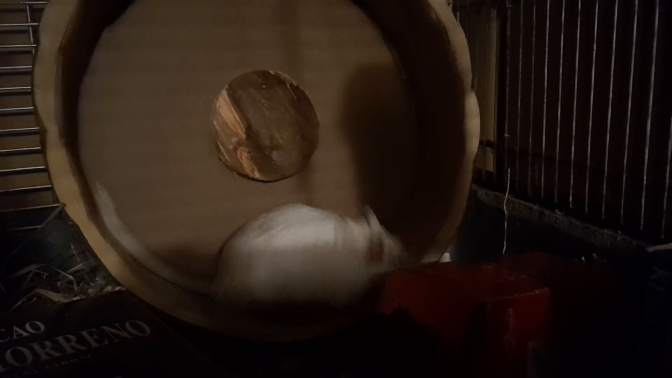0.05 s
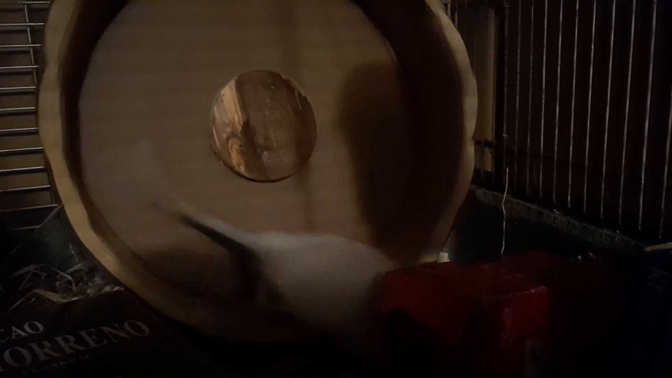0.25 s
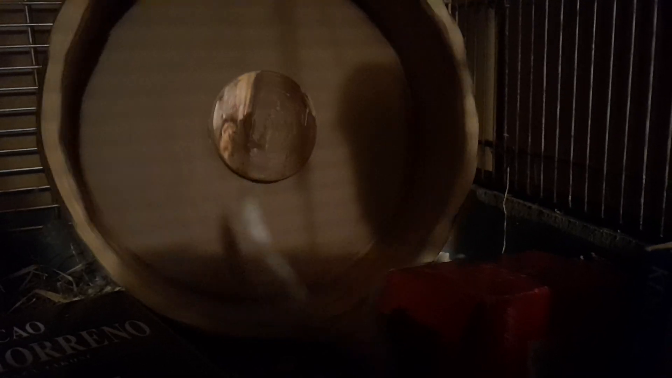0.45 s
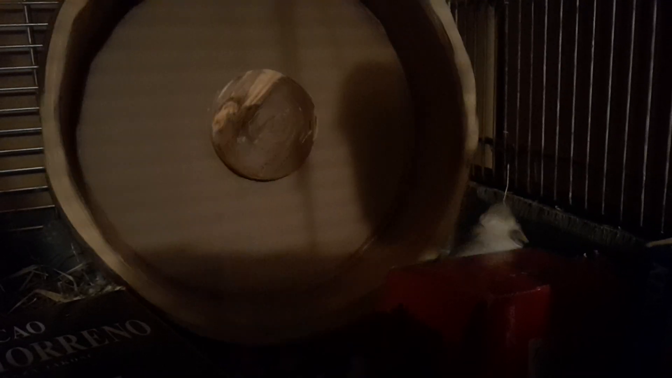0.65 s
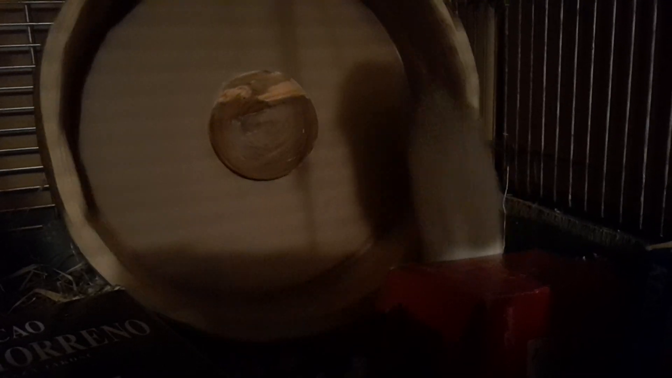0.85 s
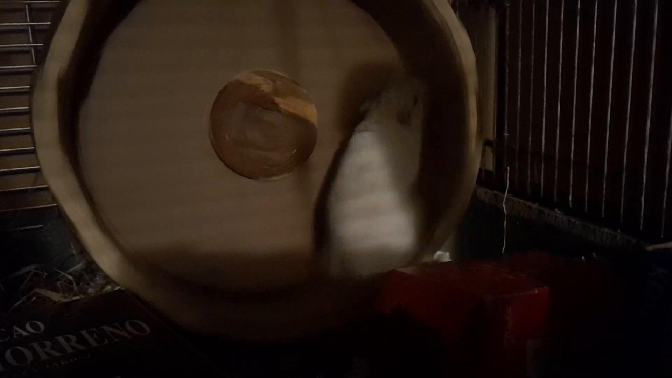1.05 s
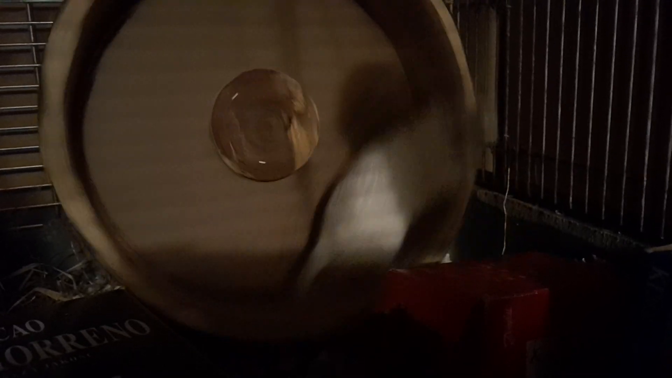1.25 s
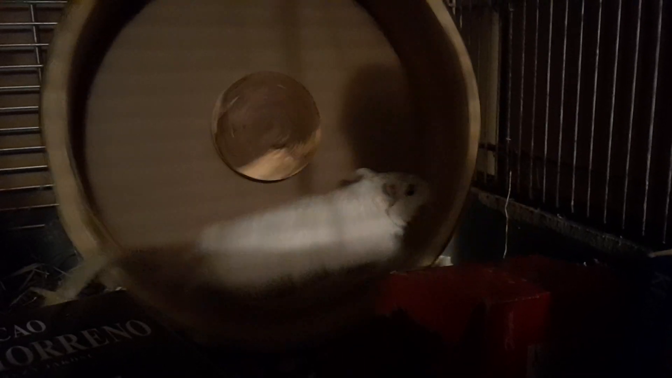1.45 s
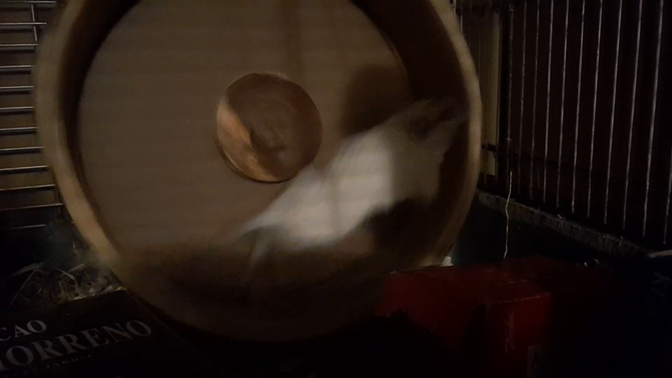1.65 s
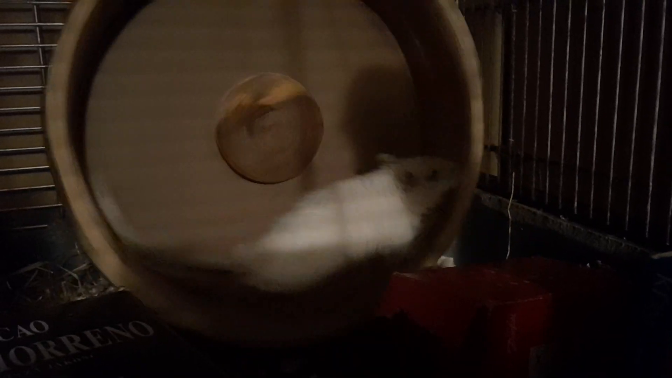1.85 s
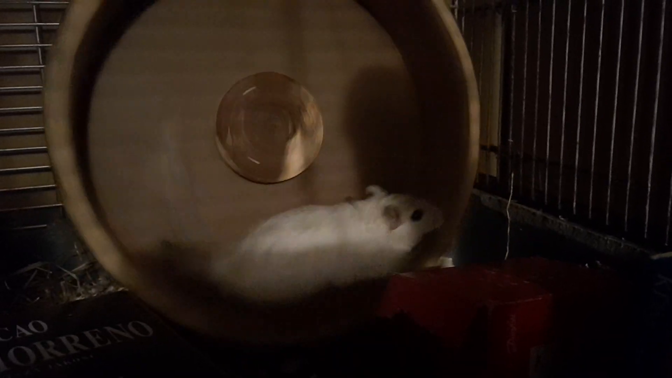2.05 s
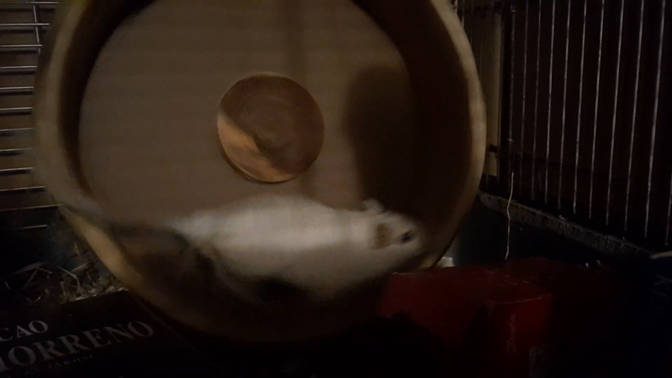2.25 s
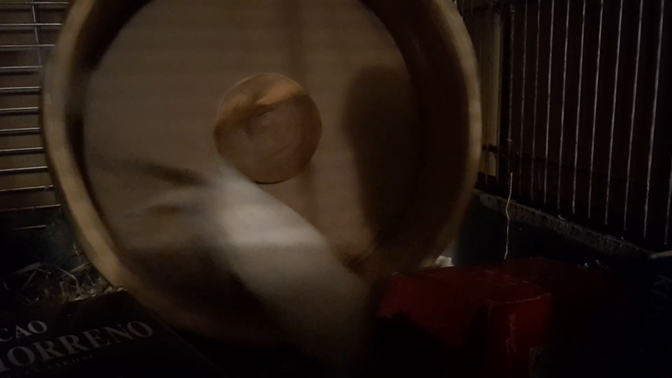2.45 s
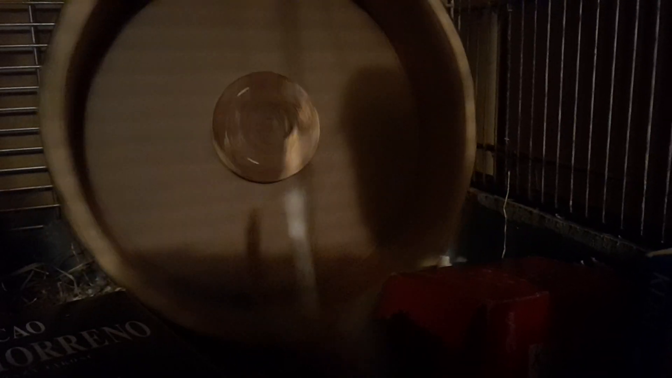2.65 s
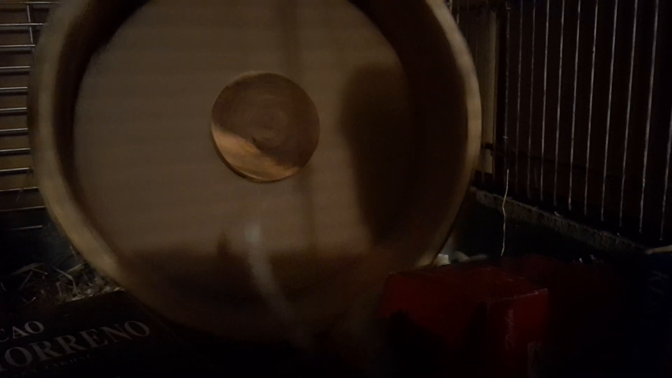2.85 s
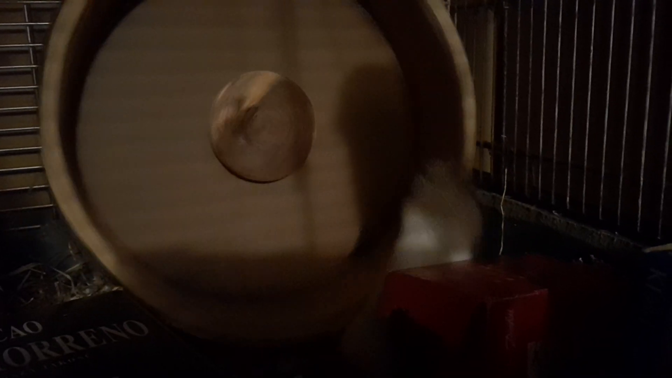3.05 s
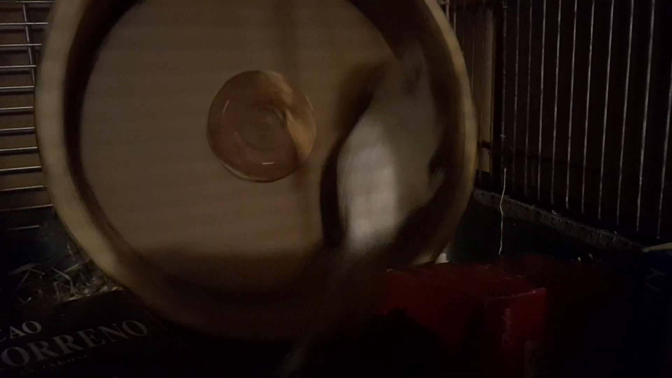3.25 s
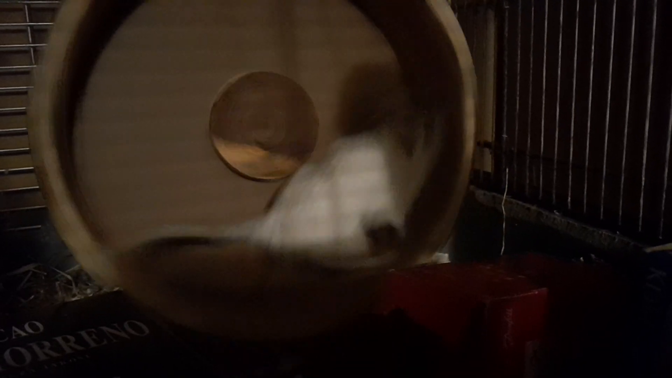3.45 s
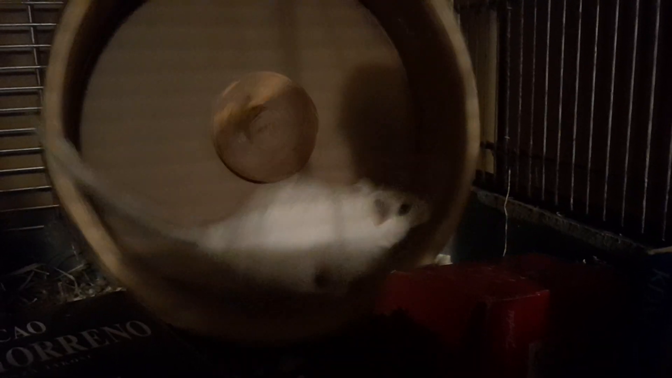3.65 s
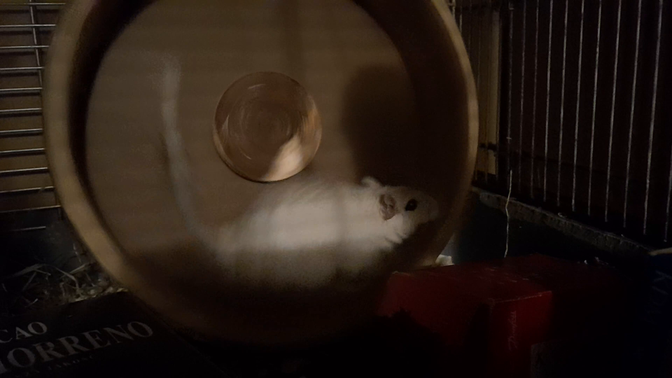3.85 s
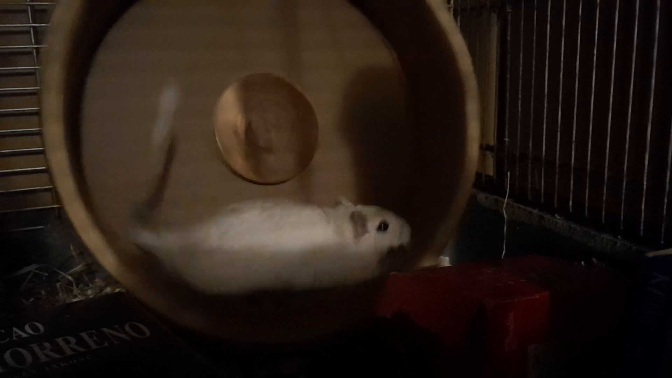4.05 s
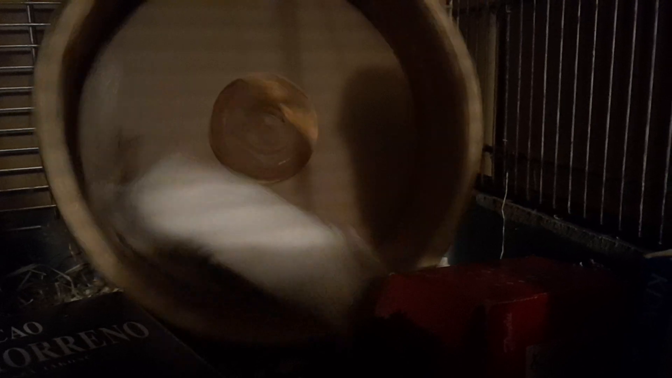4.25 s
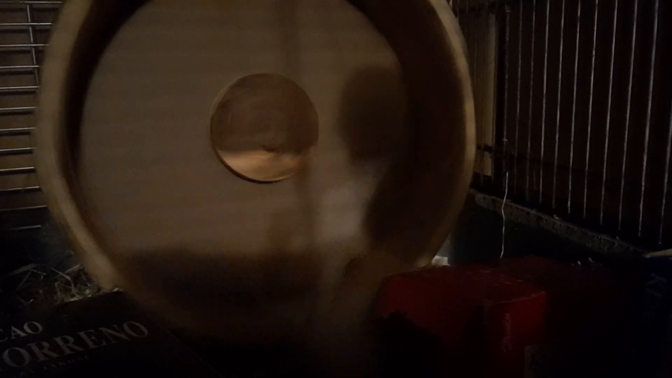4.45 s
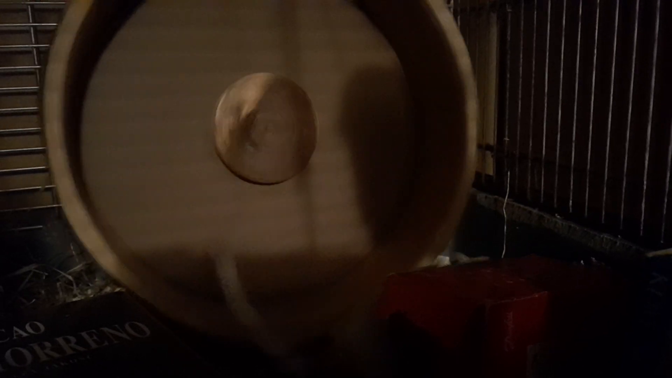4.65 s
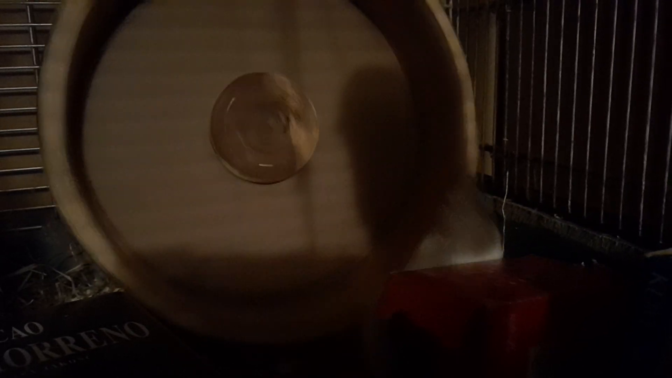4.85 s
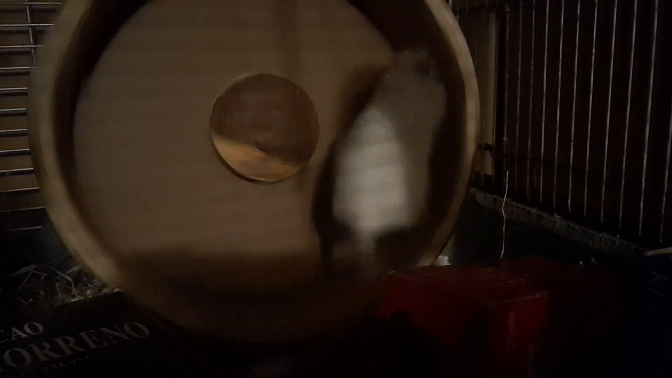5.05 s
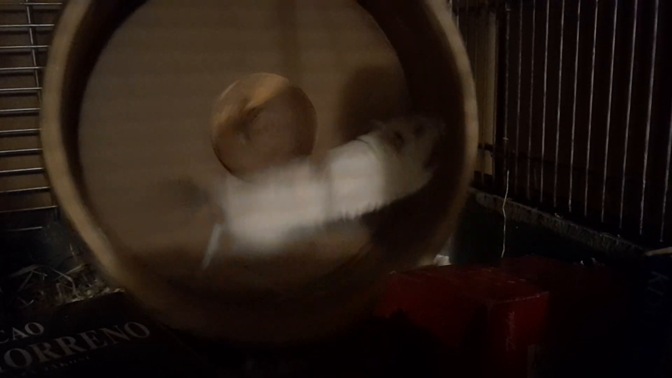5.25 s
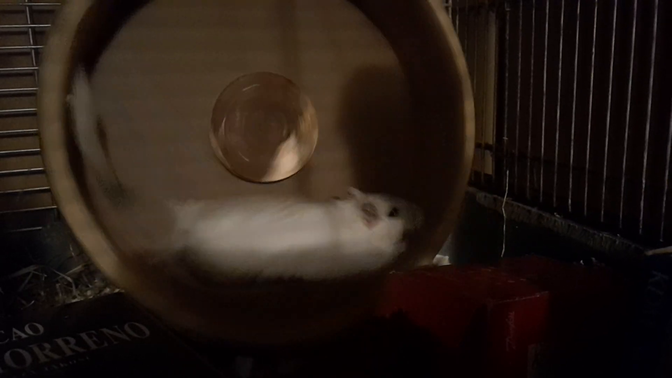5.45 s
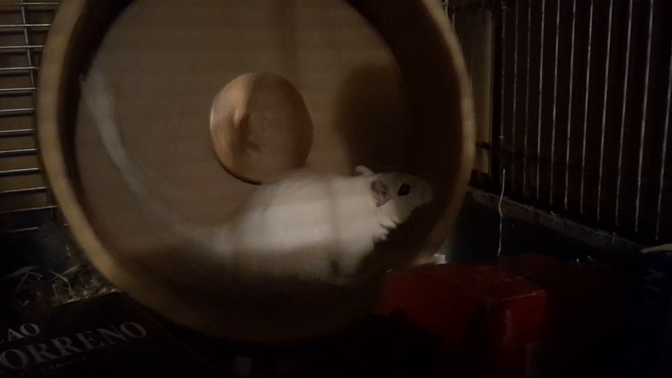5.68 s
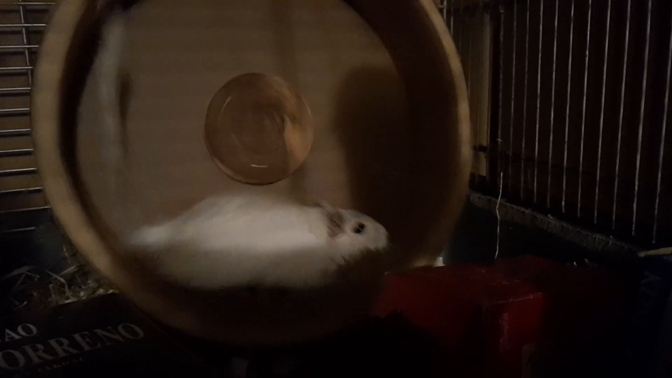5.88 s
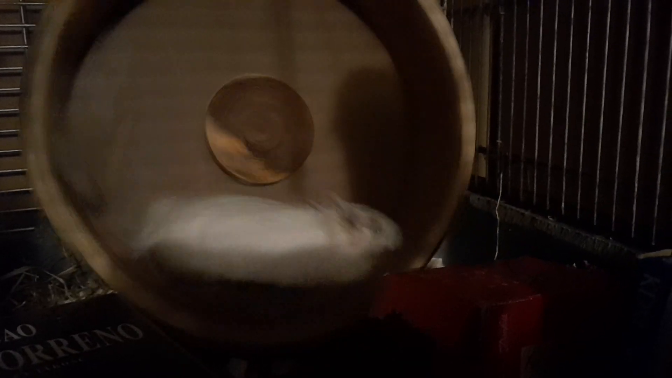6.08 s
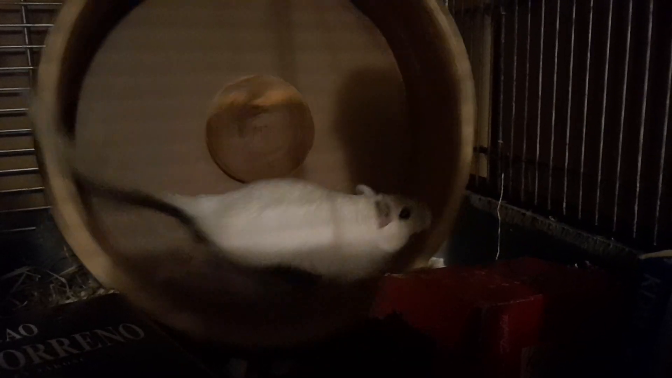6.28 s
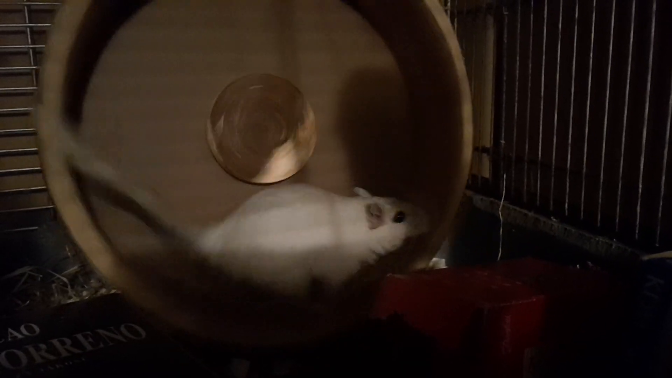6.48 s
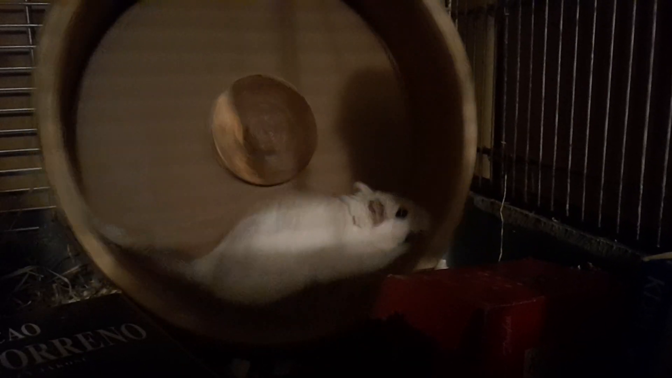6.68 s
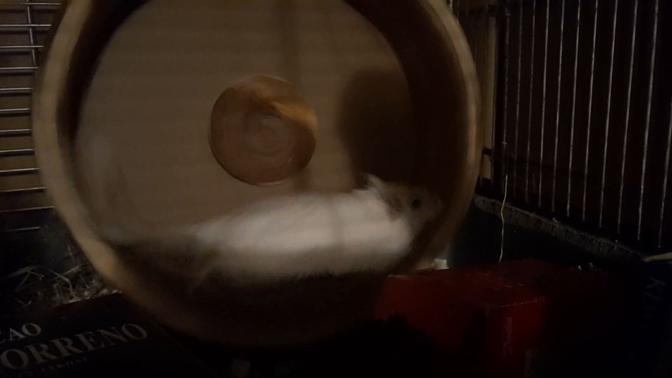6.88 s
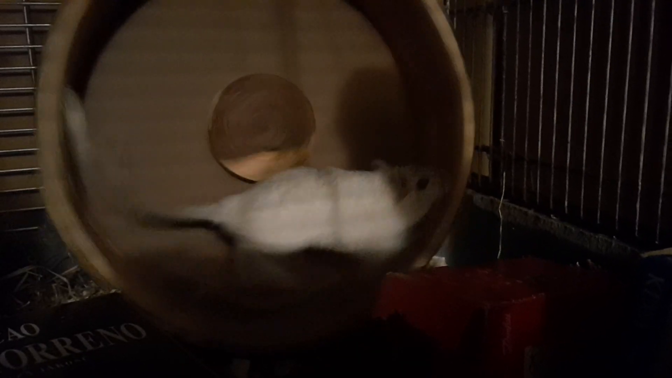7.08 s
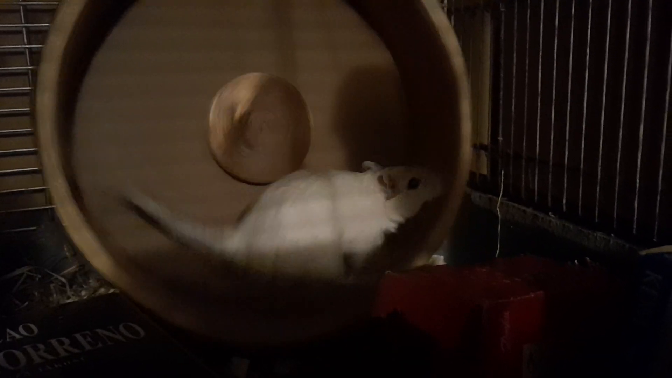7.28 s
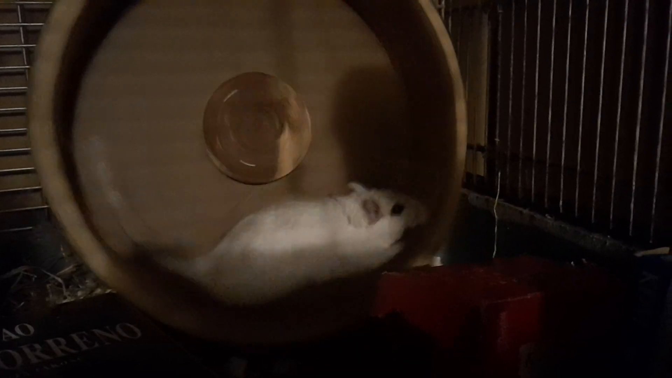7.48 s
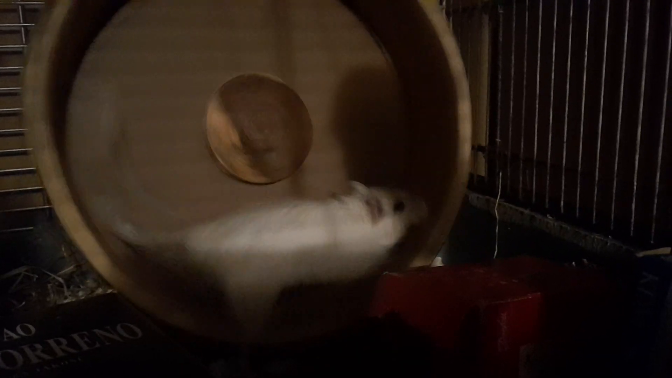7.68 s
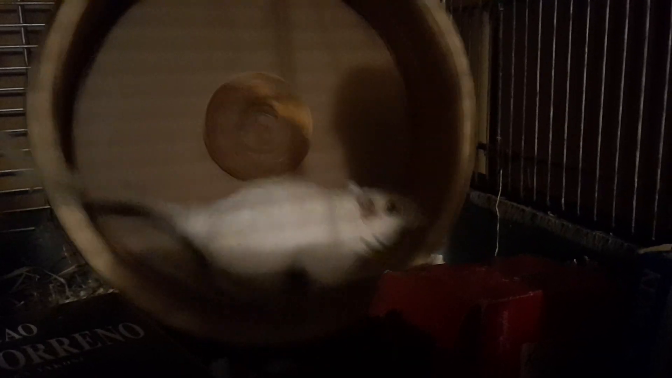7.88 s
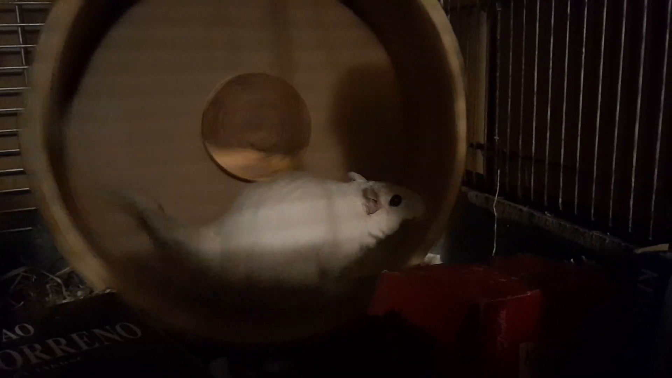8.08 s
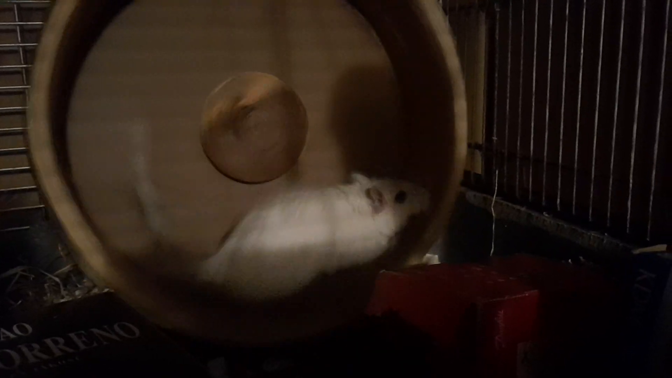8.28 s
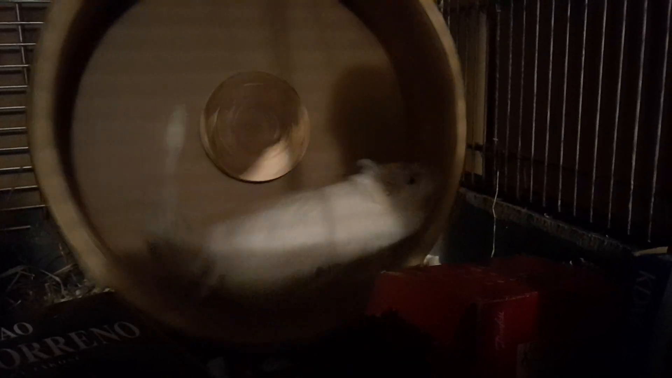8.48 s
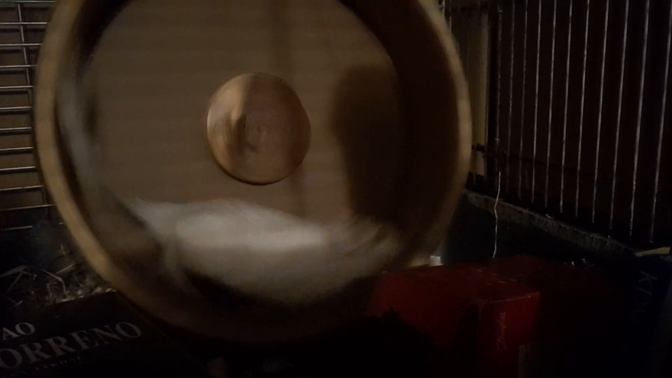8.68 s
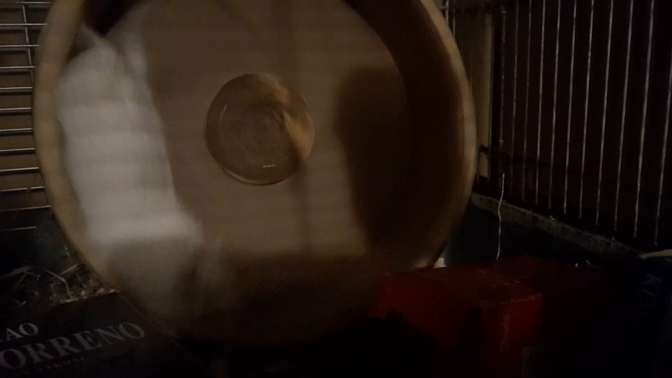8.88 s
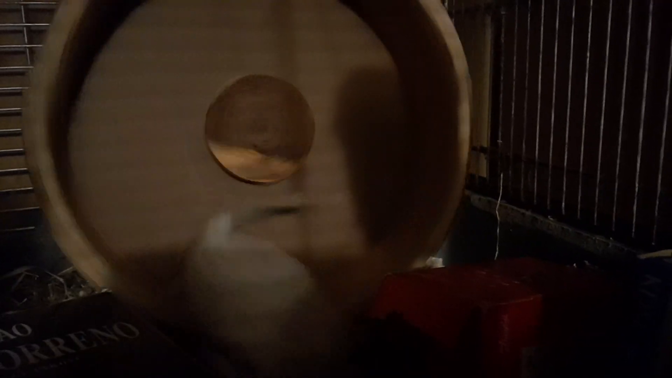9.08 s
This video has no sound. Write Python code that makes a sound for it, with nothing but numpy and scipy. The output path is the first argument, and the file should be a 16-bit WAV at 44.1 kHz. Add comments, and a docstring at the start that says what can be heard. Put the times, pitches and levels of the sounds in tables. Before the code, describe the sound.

Dull wooden knocks and pattering paws from a rodent's exercise wheel come in bursts, with crackling bedding and soft bumps in the pauses.

```python
"""A wooden wheel knocks on its loose axle as a gerbil runs in spurts, hopping into wood shavings in between.
Each knock is a set of swelling, fading tones, with a rattle of the stand and a long ringing of the wheel after
it. Paws slap the rim (ringing tones and noise), claws tick (short noise), the axle rumbles, scrapes and
squeaks. The body bumps on the cage floor and the shavings crackle (shaped noise and tiny pings). A faint steady
hum and hiss fill the small room; two microphones stand close by."""
import sys
import numpy as np
from scipy import signal
from scipy.fft import rfft, irfft, next_fast_len
from scipy.io import wavfile

SR = 44100
rng = np.random.default_rng(int(sys.argv[2]) if len(sys.argv) > 2 else 0)


def wav_out(sig):
    """Save sig, one row per channel (or a flat mono array), as 16-bit PCM at SR to the path in sys.argv[1]."""
    wavfile.write(sys.argv[1], SR, np.round(np.clip(np.atleast_2d(sig).T, -1, 1) * 32767).astype(np.int16))


N = 402633
T = np.arange(N) / SR  # time of every sample [s]

# bounds that knock the wheel on its axle and drive it round: (time [s], level [dB])
BOUNDS = [(0.419, -27.5), (0.668, -29), (0.949, -20), (1.448, -20.5), (1.518, -14.5), (1.63, -20),
          (1.733, -15.5), (2.134, -1.5), (2.421, -9.5), (2.572, -14.5), (2.652, -15), (3.023, -24.5),
          (3.173, -17.5), (3.415, -28), (3.605, -5.5), (3.6685, -16), (3.7771, 3), (3.877, 0), (3.96, -9),
          (3.9818, 0), (4.265, -6.5), (4.424, -16.5), (5.262, -22), (5.398, -10.5), (5.482, -1.5),
          (5.5599, -2), (5.635, -4.5), (5.725, -8), (5.835, -6.5), (6.0513, -3), (6.194, -6.5), (6.316, -6),
          (6.456, -10), (6.531, -4), (6.808, -17), (7.013, -20), (7.095, 4), (7.186, -7), (7.256, -8.5),
          (7.326, -6.5), (7.4416, -10), (7.557, -10.5), (7.58, -1.5), (7.791, -6.5), (7.936, -11),
          (8.0163, -18), (8.05, -2), (8.119, -4), (8.224, -8), (8.389, -10.5), (8.45, -13.5), (8.55, 1.5),
          (8.618, -17), (8.819, 1.5), (8.892, 1), (9.0796, 2)]
# spurts of running in the wheel: (start [s], end [s], level [dB])
RUNNING_SPURTS = [(1.46, 2.417, -3.5), (3.333, 4.203, -1), (5.299, 6.68, -1), (6.872, 8.85, 0.5)]
# colour of the low rumble: (frequency [Hz], level [dB])
RUMBLE_TONE = [(18, -49), (30, -8.5), (69, 0.5), (162, -3), (196, -11), (237, -1), (397, -11), (446, -10.5),
               (517, -7.5), (693, -19.5), (839, -20.5), (1000, -49), (1300, -62), (2200, -120)]


def undb(db):
    """Turn decibels into a gain."""
    return 10 ** (np.asarray(db) / 20)


def colour(x, points):
    """Filter by (frequency [Hz], level [dB]) points, falling steeply outside them."""
    hz, db = np.transpose(points)
    size = next_fast_len(x.shape[-1])
    f = np.maximum(np.fft.rfftfreq(size, 1 / SR), 1)
    skirts = np.minimum(f / hz[0], 1) ** 2 * np.minimum(hz[-1] / f, 1) ** 2
    gain = undb(np.interp(np.log(f), np.log(hz), db)) * skirts
    return irfft(rfft(x, size) * gain, size)[..., :x.shape[-1]]


def unit(x):
    """Scale to an rms level of 1."""
    return x / np.sqrt(np.mean(x ** 2))


def noise(size, alike=0):
    """Two channels of white noise; alike is the share of power they have in common."""
    alike = np.clip(alike, 0, 1)
    own = rng.standard_normal((2, size))
    common = rng.standard_normal(size)
    return np.sqrt(1 - alike) * own + np.sqrt(alike) * common


def fade(t, t60):
    """Die away exponentially, falling by 60 dB in t60 seconds."""
    return np.exp(-np.log(1000) * t / t60)


def add(out, s, sound):
    """Mix a sound in at time s [s]."""
    i = max(int(s * SR), 0)
    out[:, i:i + sound.shape[-1]] += sound[:, :max(N - i, 0)]


def walk(rate):
    """A random wander with a spread near 1, taking a new direction rate times a second."""
    times = np.arange(0, T[-1] + 1, 1 / rate)
    return 1.36 * np.interp(T, times, rng.standard_normal(len(times)))


def grains(rate, spread_db, t60):
    """Random tiny contacts, rate per second and of unequal size, each a short noise burst; rms 1."""
    count = 40000
    when = rng.random(count)
    size = undb(spread_db * np.minimum(rng.exponential(size=count), np.log(15)))
    keep = int(min(rate * N / SR, count))
    power = np.bincount((when[:keep] * N).astype(int), size[:keep] ** 2, N)
    # power dies twice as fast as amplitude
    power = signal.lfilter([1], [1, -fade(2 / SR, t60)], power)
    return unit(np.sqrt(power) * noise(N))


def flakes(count, cycles, spread_db):
    """Single shavings flick, each ringing briefly at its own pitch; rms 1."""
    t, out = T[:int(.03 * SR)], np.zeros((2, N))
    for when, pitch, size, lag in rng.random((count, 4)):
        hz = 900 * 16 ** pitch
        phase = np.array([[0], [lag]])  # left and right, in cycles
        ping = np.sin(2 * np.pi * (hz * t + phase)) * fade(t, cycles / hz)
        loudness = undb(-spread_db * np.log(max(size, 1 / 10)))
        add(out, when * T[-1], hz * loudness * ping)
    return unit(out)


def strokes(table, swell, release_t60):
    """Level of rubbing strokes: each swells over a share of its length, holds, then dies away in the cage."""
    power = np.zeros(N)
    for s, length, db in table:
        t = T[:max(N - int(s * SR), 0)]
        shape = np.minimum(t / (swell * length), 1) * fade(np.clip(t - length, 0, 2), release_t60)
        power[N - len(t):] += (undb(db) * shape) ** 2
    return np.sqrt(power)


def spin(push, coast_t60, pickup_s):
    """Vigour of the turning wheel: every bound adds a push that friction wears away."""
    power = np.zeros(N)
    for s, db in BOUNDS:
        t = T[:N - int(s * SR)]
        vigour = undb(push * db) * (1 - np.exp(-t / pickup_s)) * fade(t, coast_t60)
        power[N - len(t):] += vigour ** 2
    return np.sqrt(power)


def light_steps(per_s, level_db, spread_db, tone_db, tone_spread_db):
    """The lesser footfalls of each spurt, unevenly spaced: rows of (time [s], level [dB], tone [dB])."""
    chance = rng.standard_normal((400, 3))
    times = (np.arange(len(chance)) + chance[:, 0] / 2) / per_s
    steps = []
    for start, end, db in RUNNING_SPURTS:
        for s, (_, loud, bright) in zip(times, chance):
            if start < s < end:
                steps.append((s, level_db + db + spread_db * loud, tone_db + tone_spread_db * bright))
    return steps


def landings(pad_db=-52, hard_db=-17, weight=1.0):
    """Every bound lands on soft pads: rows of (time [s], level [dB], hardness [dB])."""
    return [(s, pad_db + weight * db, hard_db) for s, db in BOUNDS]


def quiet_room(floor_db=-77):
    """Faint steady hum of the room and hiss of the microphones: noise with a fixed colour."""
    # colour of the hum and hiss: (frequency [Hz], level [dB])
    room_tone = [(18, -43), (30, -24.5), (134, -0.5), (198, -10), (413, -17), (596, -15.5), (662, -8),
                 (1310, -21.5), (2100, -21.5), (2330, -20), (2800, -25), (4370, -18), (6150, -24.5),
                 (6650, -20.5), (15800, -27)]
    return undb(floor_db) * unit(colour(noise(N, alike=0.29), room_tone))


def rustle_level(weighted, fur_db=-75):
    """Each brush is one stroke, heavy ones fuller in the mids; running adds a faint rustle of fur and feet."""
    # the body brushes through shavings: (start [s], length [s], level [dB], extra mid-range level [dB])
    brush_table = [(0, 0.049, -74.5, 3), (0.186, 0.067, -65.5, -4.5), (0.308, 0.071, -64, -6),
                   (0.414, 0.033, -62, -1), (0.497, 0.13, -70.5, -0.5), (0.654, 0.06, -63, 1),
                   (0.728, 0.14, -64, -1), (0.883, 0.087, -62.5, 0), (0.998, 0.072, -57, 2),
                   (1.126, 0.13, -66, -2), (1.23, 0.042, -62.5, 4.5), (1.303, 0.04, -65.5, -0.5),
                   (1.81, .1, -70.5, -1), (2.434, 0.044, -57, 0.5), (2.534, 0.063, -61, 2.5),
                   (2.615, 0.026, -66, -5), (2.89, 0.019, -71, 5), (2.94, 0.07, -66, -3),
                   (3.096, 0.057, -62.5, -3.5), (3.214, 0.054, -59.5, -1.5), (3.321, 0.0083, -65.5, 4.5),
                   (4.296, 0.032, -60, -0.5), (4.367, 0.032, -69, -7), (4.411, 0.042, -55.5, -0.5),
                   (4.721, 0.15, -70.5, 9.5), (4.79, 0.067, -63.5, -5), (4.905, 0.066, -72, -4),
                   (4.964, 0.039, -64.5, 2), (5.106, 0.048, -57.5, -5.5), (5.173, 0.052, -72.5, 0),
                   (5.294, 0.023, -59.5, -1.5), (6.58, 0.031, -70, 0), (6.899, 0.062, -74, -4),
                   (7.47, 0.12, -70.5, 4), (7.627, 0.051, -69, 3), (8.421, 0.15, -73.5, 6),
                   (8.726, 0.24, -67.5, 6), (8.857, 0.04, -58.5, 5), (8.928, 0.065, -47, 2),
                   (9.058, 0.015, -57.5, 6), (9.114, 0.044, -51.5, -3)]
    brushes = [(s, length, db + weighted * weight_db) for s, length, db, weight_db in brush_table]
    brushing = strokes(brushes, swell=0.37, release_t60=0.27)
    spurts = [(start, end - start, db) for start, end, db in RUNNING_SPURTS]
    running = strokes(spurts, swell=0.086, release_t60=.35)
    return np.hypot(brushing, undb(fur_db) * running)


def shavings(rustle_db=1, smooth_db=-4, flake_db=-4, wander_db=2):
    """Dry shavings crackle and slide; their colour shifts as different flakes are touched."""
    # colour of the rustle before it shifts: (frequency [Hz], level [dB])
    rustle_tone = [(410, -6.5), (700, 1), (767, -7), (819, -23), (921, -6.5), (2070, -10), (2380, -8.5),
                   (2830, -12.5), (4230, -4.5), (6020, -12.5), (10500, -14), (11700, -9.5), (15800, -12.5)]
    crackle = grains(rate=800, spread_db=7.0, t60=0.047)
    crackle = crackle + undb(flake_db) * flakes(count=9000, cycles=180, spread_db=4)
    crackle = crackle + undb(smooth_db) * noise(N)
    size = next_fast_len(N)
    spectrum = rfft(colour(crackle, rustle_tone), size)
    f = np.fft.rfftfreq(size, 1 / SR)
    # seven overlapping bands, each wandering in level by itself
    bands = []
    for hz in np.geomspace(250, 16000, 7):
        octave = np.maximum(1 - abs(np.log2(np.maximum(f, 1) / hz)), 0)
        bands.append(irfft(spectrum * octave, size)[:, :N] * undb(wander_db * walk(rate=34)))
    mids, treble = sum(bands[:4]), sum(bands[4:])
    rustle = mids * rustle_level(weighted=True) + treble * rustle_level(weighted=False)
    return undb(rustle_db) * rustle / np.std(mids + treble)


def squeaks(squeak_db=1, arch=0.028, waver=0.015):
    """Wood sticks and slips on the axle: a thin short tone that arches and wavers in pitch."""
    # squeaks of the dry axle: (start [s], length [s], central pitch [Hz], level [dB])
    squeak_table = [(7.406, .04, 3900, -74), (7.475, 0.047, 5620, -69), (7.559, 0.057, 3120, -64)]
    out = np.zeros((2, N))
    for s, length, hz, db in squeak_table:
        swell = np.sin(np.linspace(0, np.pi, int(length * SR)))
        pitch = hz * (1 + arch * (swell - .5) + waver * walk(rate=280)[:len(swell)])
        phase = 2 * np.pi * np.cumsum(pitch) / SR + np.array([[0], [1]])  # right is 1 radian ahead
        add(out, s, undb(db + squeak_db) * swell * np.sin(phase))
    return out


def bumps(bump_db=0, t60=0.12, flank_db=-18):
    """Soft dull bumps of the body on the cage floor: bands of noise that die away."""
    # bumps and scuffs of the body: (time [s], level [dB], centre of the band [Hz])
    bump_table = [(.395, -67, 608), (.421, -62, 590), (.53, -66, 854), (.668, -69, 378), (0.721, -68, 416),
                  (.76, -62, 505), (.788, -58.5, 386), (0.819, -67, 327), (.908, -60, 444),
                  (0.946, -53, 300), (0.977, -56, 237), (1.03, -74, 298), (1.261, -59.5, 560),
                  (3.136, -61, 560), (3.416, -60, 520), (4.838, -60, 565)]
    t, out = T[:int(.2 * SR)], np.zeros((2, N))
    for s, db, hz in bump_table:
        band = [(hz / 2, flank_db), (hz, 0), (hz * 2, flank_db)]
        thud = unit(colour(noise(len(t), alike=0.86), band))
        add(out, s, undb(db + bump_db) * thud * fade(t, t60) * (1 - np.exp(-t / 0.0011)))
    return out


def ticks(tick_db=1, t60=0.037, room_db=-17, room_t60=0.3, usual_top_db=-10, vary_db=4.5, rise_s=0.00066):
    """A claw catches or a shaving snaps: a dry click with resonances of its own, scattered by the cage."""
    # the loudest clicks: (time [s], level [dB], brightness of the top octave [dB])
    loud_ticks = [(0.2466, -55, -12), (0.8304, -52, -14), (1.0256, -59, 0), (1.0782, -45, -42),
                  (1.1847, -52, 2), (1.449, -58.5, -16), (1.688, -49, -12.5), (1.9588, -58, -38),
                  (2.4305, -51, -2), (2.452, -50, -3), (2.4843, -52, -9), (3.0234, -48.5, -12),
                  (3.216, -49, -9), (3.2312, -49, -16), (3.3872, -55.5, -6), (3.4203, -57, -16),
                  (3.6847, -56, 5), (4.0904, -60, -11), (4.3082, -64, -2), (5.0712, -55, -8),
                  (5.2097, -57, -13), (5.2444, -57.5, -11), (5.2637, -53, -14), (5.3037, -56, -19),
                  (5.3166, -51.5, -13), (5.642, -50, -16), (5.7787, -50, -20), (6.0415, -51.5, -22),
                  (6.2842, -53.5, -15), (6.347, -61, -3), (6.44, -65.5, -2), (6.6217, -50, -43),
                  (6.743, -57, -4), (6.8391, -59, -22), (7.129, -50, -13), (7.1738, -54.5, -22),
                  (7.2455, -55, 0), (7.3522, -51.5, -29), (7.655, -48.5, -13), (7.694, -52.5, -3),
                  (7.8607, -56.5, -14), (7.9096, -55.5, -25), (8.031, -55, -14), (8.313, -53.5, -14),
                  (8.4113, -55, -4), (8.6813, -50.5, 3), (8.74, -56, -14), (8.842, -47, -7.5),
                  (8.9331, -38.5, -2), (9.057, -48, -25)]
    # usual colour of a click: (frequency [Hz], level [dB])
    tick_tone = [(1200, -7.5), (2400, -6), (3100, -12.5), (4200, 7), (5200, 0.5), (6500, -3), (9000, -1),
                 (12000, 0), (15500, -0.5)]
    t, out = T[:int(.2 * SR)], np.zeros((2, N))
    shape = np.hypot(fade(t, t60), undb(room_db) * fade(t, room_t60)) * (1 - np.exp(-t / rise_s))
    hz = np.geomspace(1000, 16000, 40)
    usual = np.interp(hz, *np.transpose(tick_tone))
    light = light_steps(per_s=17, level_db=-63.0, spread_db=4.5, tone_db=-11.5, tone_spread_db=-4.5)
    for s, db, top_db in loud_ticks + light:
        brighter = (top_db - usual_top_db) * np.interp(hz, [4500, 7500], [0, 1])
        tone = usual + brighter + vary_db * rng.standard_normal(len(hz))
        click = unit(colour(noise(len(t)), np.column_stack([hz, tone])))
        add(out, s - .0005, undb(db + tick_db) * shape * click)
    return out


def taps(tap_db=3, slap_db=-9, slap_t60=0.076, room_db=-19, room_t60=0.34, vary_db=3,
         usual_hard_db=-6, harden=0.94, apart_s=0.0002):
    """A paw slaps the rim: a claw rings its high modes, a soft pad the low ones; each spot has its own tone."""
    # the loudest paw slaps: (time [s], level [dB], hardness [dB])
    loud_taps = [(1.077, -52.5, -4), (1.774, -58, -7), (1.843, -55.5, -11), (1.87, -53, -5),
                 (1.89, -56, -7), (1.955, -56, -11), (2.057, -58, -20), (2.157, -43.5, -9), (2.23, -59, 3),
                 (3.418, -50.5, -6.5), (3.686, -45, -7), (3.8, -40.5, -20.5), (3.883, -48.5, -20),
                 (3.982, -50, -8.5), (4.04, -55, -8), (4.507, -54, -7), (4.725, -55.5, -4.5),
                 (5.488, -49.5, -12.5), (5.582, -56.5, -6), (5.638, -42.5, -10.5), (5.779, -46.5, -7),
                 (5.979, -42, -18.5), (6.016, -48, -6.5), (6.139, -40.5, -20.5), (6.586, -58, 1),
                 (6.621, -43, -11.5), (6.755, -55.5, -13), (6.839, -53.5, -17), (6.913, -49.5, -14.5),
                 (7.01, -46.5, -10.5), (7.094, -44, -10.5), (7.134, -39, -18), (7.151, -50, -7),
                 (7.173, -46.5, -10), (7.246, -50, -8.5), (7.353, -44.5, -11.5), (7.505, -42, -13),
                 (7.629, -47, -20), (7.694, -49.5, -11), (7.734, -45.5, -15), (7.875, -49.5, -10.5),
                 (7.911, -50, -12), (7.985, -42.5, -12), (8.03, -42, -16.5), (8.063, -53, -6),
                 (8.136, -53.5, -2), (8.31, -49, -8), (8.364, -47.5, -12), (8.411, -51.5, -8),
                 (8.448, -52, -11), (8.473, -48.5, -11.5), (8.555, -49, -15), (8.615, -48.5, -10.5),
                 (8.691, -41, -14.5), (8.893, -42.5, -11), (8.903, -39.5, -12), (9.06, -36, -7)]
    # ringing of the thin rim: (frequency [Hz], time to fall 60 dB [s], usual level [dB])
    rim_modes = [(556, 0.023, -4), (740, 0.0082, 4), (945, 0.034, -14.5), (1088, 0.059, -8.5),
                 (1225, 0.058, -8), (1641, 0.053, -2), (1990, 0.058, -3), (2400, 0.051, -16)]
    # usual colour of the slap noise: (frequency [Hz], level [dB])
    tap_tone = [(250, -18), (500, -3), (850, -3.5), (1100, -3.5), (1350, -8.5), (1650, -5), (2000, -6),
                (2500, -4.5), (3100, -15.5), (4200, -8), (7000, -19)]
    t, out = T[:int(.25 * SR)], np.zeros((2, N))
    hz, t60, mode_db = np.transpose(rim_modes)[:, :, None]
    scatter = np.hypot(undb(slap_db) * fade(t, slap_t60), undb(room_db) * fade(t, room_t60))
    scatter = scatter * (1 - np.exp(-t / 0.0013))
    sign = (-1) ** np.arange(len(hz))[:, None]  # neighbouring modes swing against each other
    light = light_steps(per_s=11, level_db=-59.0, spread_db=3.0, tone_db=-7.5, tone_spread_db=-0.5)
    for s, db, hard_db in loud_taps + landings() + light:
        tilt_db = harden * (hard_db - usual_hard_db)  # per octave
        gain = undb(mode_db + tilt_db * np.log2(hz / 1300) + vary_db * rng.standard_normal(hz.shape))
        ring = np.sum(sign * gain * np.sin(2 * np.pi * hz * t) * fade(t, t60), axis=0)
        ring = ring / np.linalg.norm(gain)
        # the ring reaches the right microphone a little later
        ring = np.array([ring, np.interp(t - apart_s, t, ring)])
        tone = [(f, d + tilt_db * np.log2(f / 1300)) for f, d in tap_tone]
        slap = scatter * unit(colour(noise(len(t), alike=0.29), tone))
        add(out, s - .0005, undb(db + tap_db) * (ring + slap))
    return out


def rolling(rumble_db=-54, shudder_db=-56, scrape_db=-70, scuff_db=0, rock_db=0, apart=0.28):
    """The axle rumbles and scrapes with the wheel's turning, the stand shudders; dragging paws scuff the wood."""
    # colours of the shudder and the scrape: (frequency [Hz], level [dB])
    shudder_tone = [(30, -30), (50, -2), (95, -2), (140, -18.5)]
    scrape_tone = [(350, -37), (600, -10), (652, -2), (853, -15.5), (1100, -11.5), (1380, -19), (1620, -26),
                   (1840, -20.5), (2820, -25.5), (3100, -24), (5500, -23.5), (7150, -97), (12100, -120)]
    # the wheel rocks as the gerbil clambers in or sets off: (start [s], length [s], level [dB])
    rocking_table = [(.9, 0.17, -68.5), (1.85, 0.33, -71), (3.25, 0.44, -69.5), (4.78, 0.46, -71.5),
                     (5.45, 0.37, -57.5), (6.9, 0.25, -66.5)]
    # paws drag over the wood: (start [s], length [s], level [dB])
    scuff_table = [(.74, 0.15, -76), (1, 0.056, -71.5), (1.15, .04, -85), (1.24, .07, -74),
                   (1.68, 0.3, -70.5), (1.99, 0.25, -72.5), (2.45, 0.031, -63), (3.48, 0.14, -74.5),
                   (6.06, 0.052, -61), (6.59, 0.023, -63), (6.9, 0.18, -70.5), (7.24, 0.046, -72),
                   (7.4, .25, -60), (7.67, 0.067, -67), (8.21, 0.07, -73), (8.4, 0.18, -65),
                   (8.87, .13, -54.5)]
    middle, sides = grains(rate=110, spread_db=-2.0, t60=0.08)
    rumble = unit(colour(np.array([middle + apart * sides, middle - apart * sides]), RUMBLE_TONE))
    scrape = unit(colour(grains(rate=200, spread_db=3.5, t60=0.052), scrape_tone))
    shudder = unit(colour(noise(N, alike=0.079), shudder_tone))
    turning = spin(push=0.52, coast_t60=1., pickup_s=0.019)
    rocking = undb(rock_db) * strokes(rocking_table, swell=0.12, release_t60=0.79)
    scraping = undb(scrape_db) * spin(push=0.29, coast_t60=1.52, pickup_s=0.017)
    scuffing = undb(scuff_db) * strokes(scuff_table, swell=.2, release_t60=0.31)
    rumbling = np.hypot(undb(rumble_db) * turning, rocking)
    shaking = np.hypot(undb(shudder_db) * turning ** 0.92, undb(-4) * rocking)
    return rumble * rumbling + shudder * shaking + scrape * np.hypot(scraping, scuffing)


def knocks(knock_db=-1, rebound_s=.071, rebound_db=-15, ring_db=-2, room_db=-56, room_t60=1.0,
           lead_s=.00007, harden=0.47, vary_db=2.5, rattle_db=-54, rattle_t60=0.6, softest_db=-15, detune=0.012):
    """The wheel drops against its axle: its modes swell and fade, each at its own speed."""
    # the wheel on its stand: (settled pitch [Hz], time to fall 60 dB [s], build-up [s], level [dB])
    wheel_modes = [(72, .064, .0035, -40), (108, .065, .017, -23), (125, .355, .0156, -41),
                   (134, .147, .03, -23), (175, .158, .0074, -31), (218, .03, .0025, -30),
                   (406, .03, .0007, -36), (462, .03, .004, -31), (503, .119, .0038, -39),
                   (540, .033, .0097, -18)]
    # the wheel rings on after each knock: (frequency [Hz], time to fall 60 dB [s], level [dB])
    wheel_rings = [(53.4, 0.3, -75), (172, 0.84, -39.5), (266.2, 0.5, -46), (311.7, 0.32, -47),
                   (398, 0.52, -48), (499, 0.59, -52.5), (634, 0.16, -39.5)]
    # colour of the rattling stand: (frequency [Hz], level [dB])
    rattle_tone = [(350, 7), (480, 2), (640, -3.5), (760, -1.5), (950, -6.5), (1300, -13), (1700, -21),
                   (2500, -42)]
    stiffen, settle_s = .31, .008  # how far the pitch starts high (share), how fast it settles
    t, out = T[:int(.6 * SR)], np.zeros((2, N))
    # the contact is stiffest under the blow, so the pitch starts high and sags
    bent_time = t + stiffen * settle_s * (1 - np.exp(-t / settle_s))
    modes = []
    for hz, t60, rise, db in wheel_modes:
        swell = 1 - np.exp(-(t / rise) ** 2)
        modes.append(undb(db) * np.sin(2 * np.pi * hz * bent_time) * fade(t, t60) * swell)
    modes = np.array(modes)
    octaves = np.log2(np.array(wheel_modes)[:, 0] / 250)
    late = 1 - np.exp(-(t / 0.026) ** 2)
    for s, db in BOUNDS:
        # a harder bound makes a shorter contact and a brighter knock
        tilt_db = harden * max(db - 1, softest_db) + vary_db * rng.standard_normal()
        wheel = undb(knock_db + tilt_db * octaves) @ modes
        pitch = 1 + detune * rng.standard_normal()  # the weight sits somewhere else on each bound
        wheel = np.array([np.interp(pitch * t + side * lead_s, t, wheel) for side in (1, -1)])
        rings = np.zeros((2, len(t)))
        for hz, t60, mode_db in wheel_rings:
            phase = rng.uniform(0, 2 * np.pi) + 1.19 * rng.standard_normal((2, 1))
            rings += undb(mode_db) * np.sin(2 * np.pi * hz * t + phase) * fade(t, t60)
        room = unit(colour(noise(len(t), alike=0.064), RUMBLE_TONE)) * fade(t, room_t60)
        # the loose stand rattles, the more so under a hard bound
        rattle = undb(rattle_db + tilt_db) * unit(colour(noise(len(t), alike=0.87), rattle_tone))
        rattle = rattle * fade(t, rattle_t60) * (1 - np.exp(-t / 0.0061))
        ringing = late * (undb(ring_db) * rings + undb(room_db) * room)
        add(out, s, undb(db) * (wheel + rattle + ringing))
        # the wheel rebounds into a second, softer knock
        add(out, s + rebound_s + 0.00212 * rng.standard_normal(), undb(db + rebound_db) * wheel)
    return out


def scene():
    """Room, bedding, body, feet and wheel together."""
    background = quiet_room() + shavings()
    feet_and_body = bumps() + ticks() + taps()
    wheel = squeaks() + rolling() + knocks()
    return background + feet_and_body + wheel


def record(dry):
    """Each microphone has its own colour; the deepest bass and the top are cut."""
    # how the two microphones differ: (frequency [Hz], left minus right [dB])
    port_table = [(50, -19.5), (110, 8.5), (200, 1.5), (700, 2.5), (1300, 3), (2400, 0.5), (4400, -8),
                  (5800, 8), (8100, 14.5), (11000, 5.5), (15000, 6.5)]
    hz, lean_db = np.transpose([(1, 0)] + list(port_table) + [(SR / 2, 0)])
    ports = []
    for x, side in zip(dry, (1, -1)):
        # share of the power, keeping the sum of both sides the same
        share = 2 / (1 + undb(-side * lean_db) ** 2)
        ports.append(colour(x, np.column_stack([hz, 10 * np.log10(share)])))
    top_hz = 15850
    ports = signal.sosfilt(signal.butter(4, 40, "high", fs=SR, output="sos"), ports)
    return signal.sosfilt(signal.ellip(10, .2, 70, top_hz, fs=SR, output="sos"), ports)


dry = scene()
out = record(dry)
wav_out(out)
```